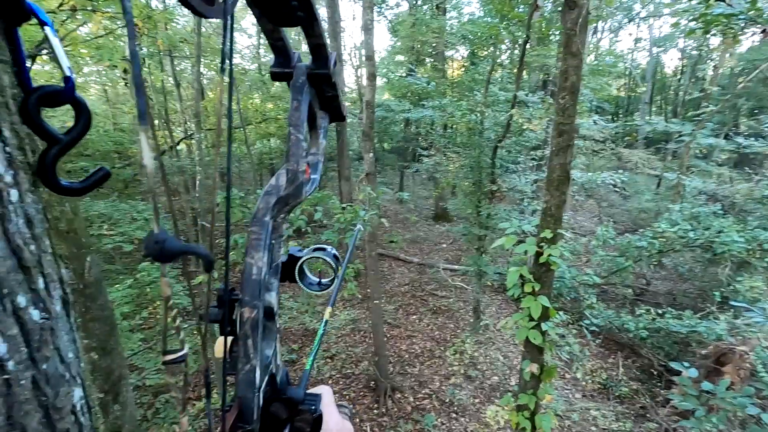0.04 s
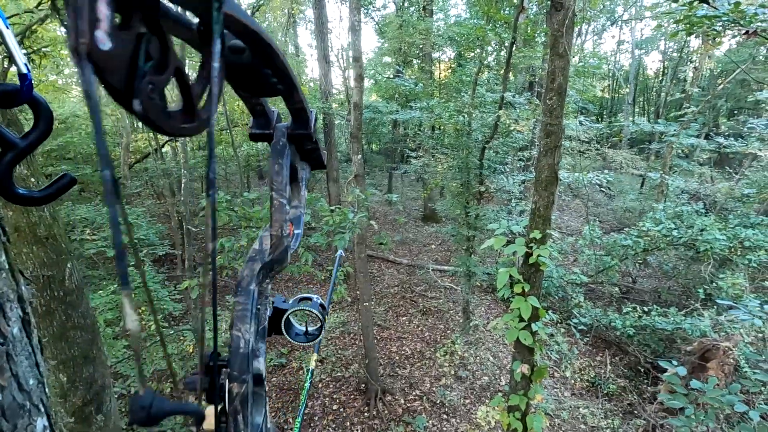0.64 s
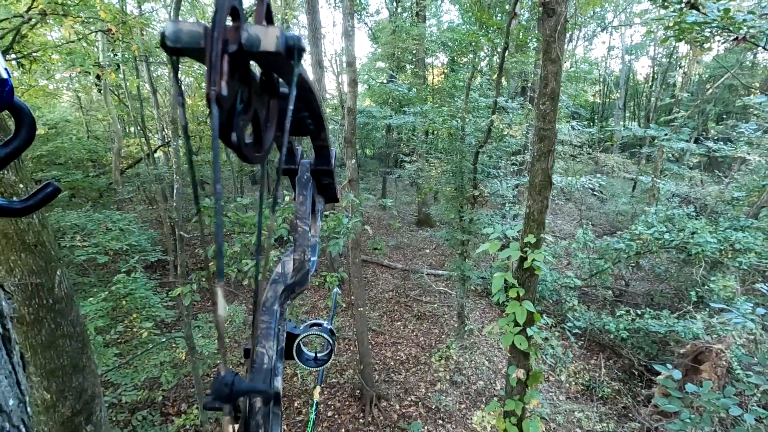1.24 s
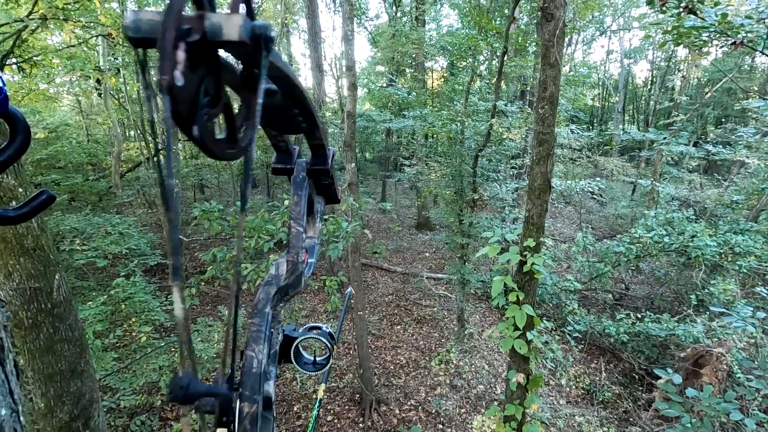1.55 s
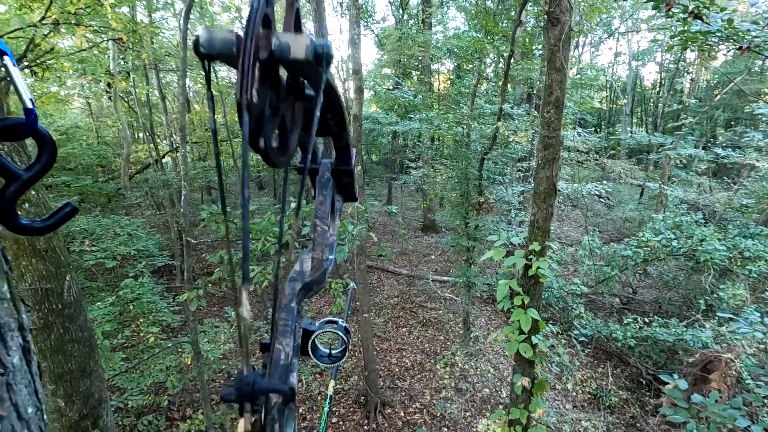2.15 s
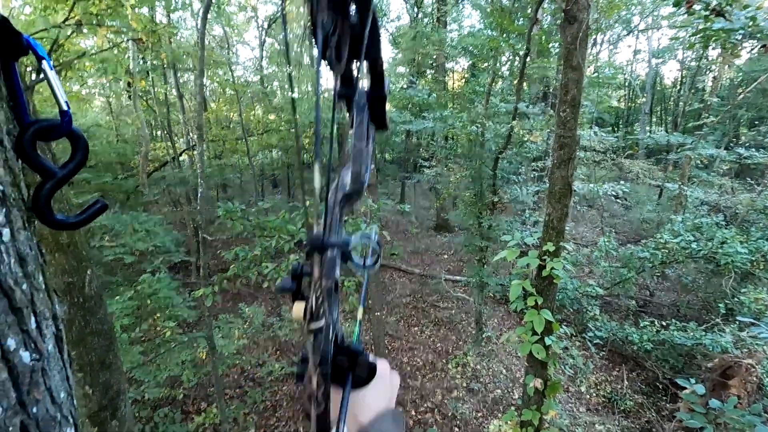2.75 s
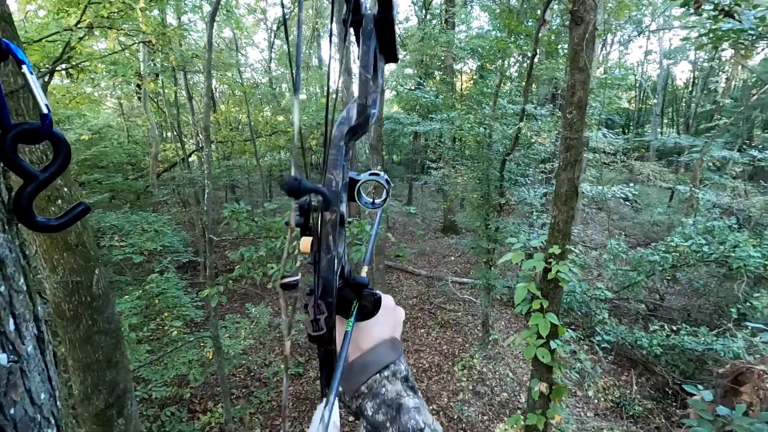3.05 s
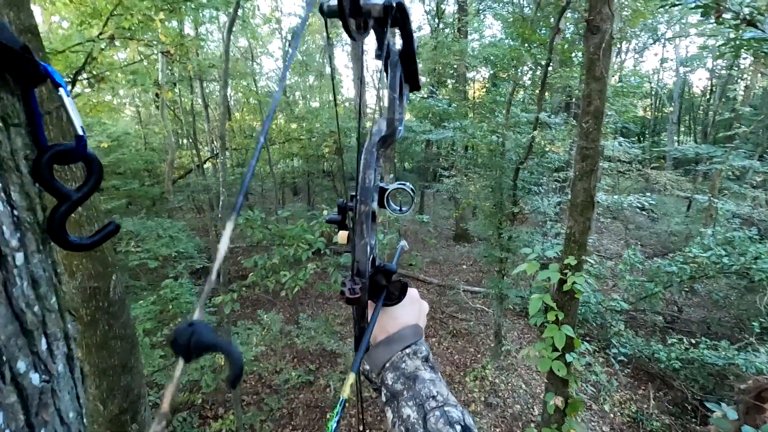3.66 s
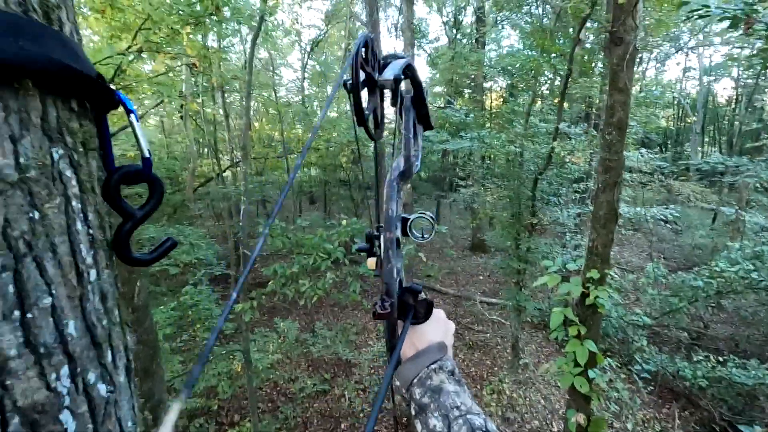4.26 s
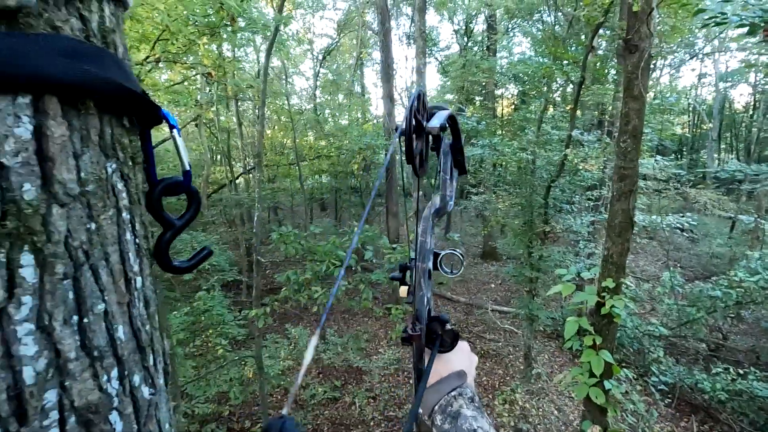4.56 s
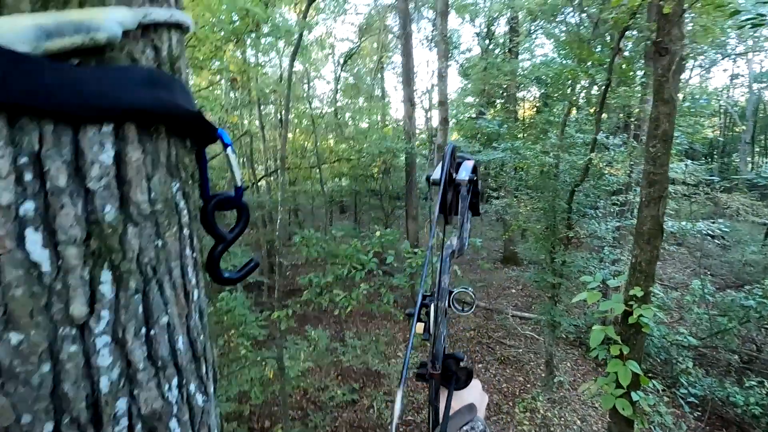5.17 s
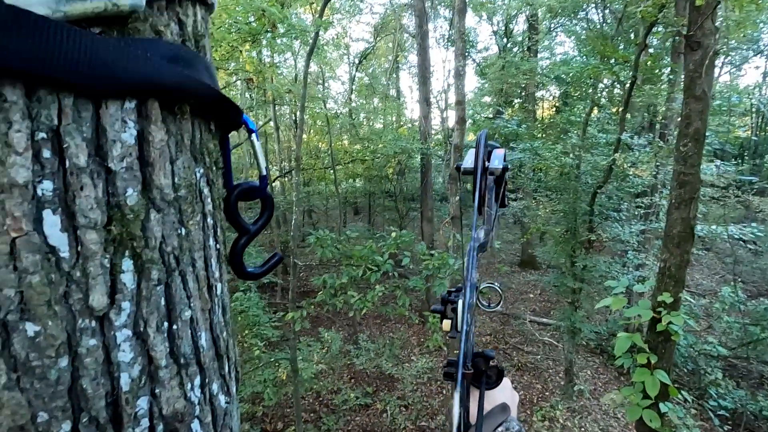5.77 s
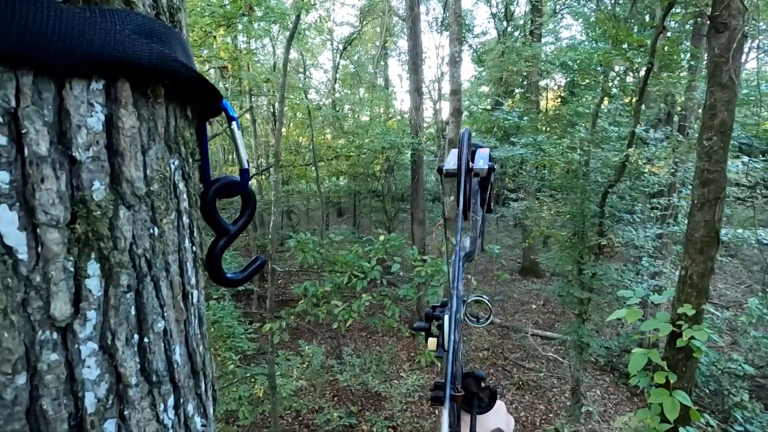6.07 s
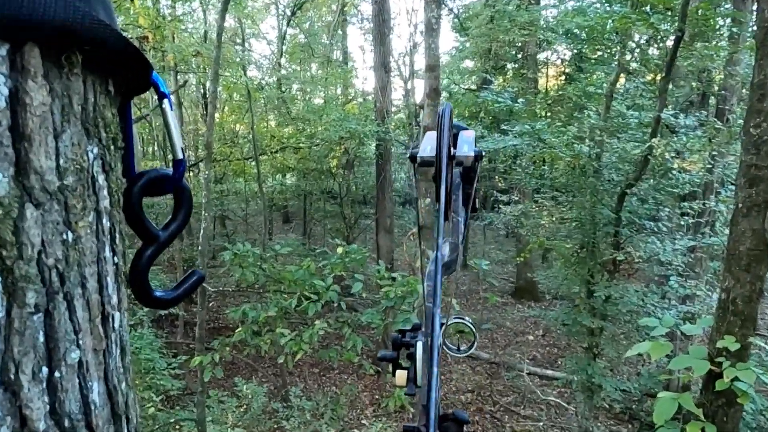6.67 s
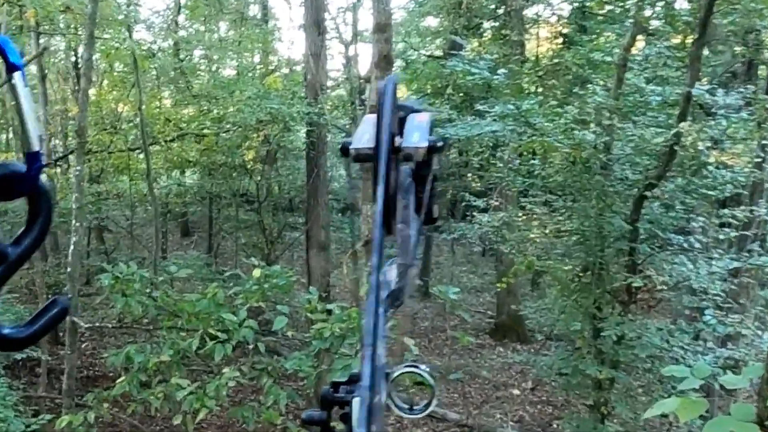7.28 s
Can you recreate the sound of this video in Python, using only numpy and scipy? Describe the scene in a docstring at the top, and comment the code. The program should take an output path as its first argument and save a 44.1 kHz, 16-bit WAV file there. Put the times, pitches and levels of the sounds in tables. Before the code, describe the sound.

A distant engine rumbles with a faint, wavering hum throughout, under the soft wash of a wood. Close to a body-worn microphone, sleeves rustle lightly and buckles give small clicks from the start. A thin bird chip sounds at 0.2 seconds, and a faint two-note song repeats five times between 1 and 2 seconds. From about 2.7 to 3.7 seconds the cloth rubs louder, creaking and giving a short rising zip, with a sharp click at 3. The bow knocks dully from 3.5 seconds, loudest at 3.9 and 4.1, with another sharp click at 4.2 and low jostling on the microphone. One more firm knock lands at 5.1. Afterwards only faint rustles and ticks remain. The bird chips again around 4.6, 6.1 and 7.5 seconds, and at 6.5 a falling whistle with a hoarse ending echoes among the trunks.

```python
"""A far engine rumbles and hums under the soft wash of a wood, heard from an archer's perch up a tree.
Sleeves rustle, creak and zip as cloth drags over cloth while a bow is lifted and moved. Buckles click,
the bow knocks, and the archer's movements jostle a microphone worn on the body. Birds chip, sing far
off, chirp and give one falling whistle; the trunks scatter their calls into a long tail."""
import sys
import numpy as np
from scipy import signal
from scipy.fft import rfft, irfft
from scipy.io import wavfile
from scipy.ndimage import uniform_filter1d

SR = 44100
rng = np.random.default_rng(int(sys.argv[2]) if len(sys.argv) > 2 else 0)


def unload_wav(signal):
    """Save mono or channel-first audio to the path in sys.argv[1] as 16-bit WAV at rate SR, clipped to [-1, 1]."""
    wavfile.write(
        sys.argv[1],
        SR,
        np.round(np.clip(np.atleast_2d(signal).T, -1, 1) * 32767).astype(np.int16),
    )


N = 331632
TIME = np.arange(N) / SR


def undb(db):
    """Turn decibels into a gain."""
    return 10 ** (np.asarray(db) / 20)


def unit(x):
    """Scale a signal to an average power of 1."""
    return x / np.sqrt(np.mean(x ** 2))


def curves(rows):
    """Join the values in each column of a table with straight lines in time."""
    times, *columns = np.transpose(rows)
    return [np.interp(TIME, times, column) for column in columns]


def during(rows):
    """True from the first time in a table to the last."""
    return (TIME > rows[0][0]) * (TIME < rows[-1][0])


def colour(x, points):
    """Shape lows and highs along (frequency [Hz], level [dB]) points, fading outside them; power 1."""
    hz, db = np.transpose(points)
    octave, knots = np.log2(np.arange(N // 2 + 1) * SR / N + 1), np.log2(hz)
    outside = np.abs(octave - np.clip(octave, knots[0], knots[-1]))
    return unit(irfft(rfft(x) * undb(np.interp(octave, knots, db) - 20 * outside), N))


def wander(rate):
    """A smooth random wobble of typical size 1 that picks a new value `rate` times a second."""
    hold = int(SR / rate)
    steps = np.repeat(rng.standard_normal(N // hold + 1), hold)
    return unit(uniform_filter1d(uniform_filter1d(steps, hold), hold)[:N])


def pan(db):
    """Left and right gains that make the left side `db` louder."""
    return undb(np.array([[db], [-db]]) / 2)


def spread(pair, side_db):
    """Make stereo from two signals: the first sits in the middle, the second adds width."""
    return pair[0] + undb(side_db) * pair[1] * np.array([[1], [-1]])


def noise(side_db):
    """White stereo noise, wider as side_db rises."""
    return spread(rng.standard_normal((2, N)), side_db)


def swells(rows, rise=0.35, shape=1.22):
    """Loudness of movements that build quickly and fade more slowly; shape 1 is pointed, 2 rounded."""
    power = np.zeros(N)
    for s, length, db in rows:
        near = slice(*np.searchsorted(TIME, [s - 2 * length, s + 4 * length]))
        from_peak = np.maximum((s - TIME[near]) / rise, (TIME[near] - s) / (1 - rise)) / length
        power[near] += (undb(db) * np.exp(-from_peak ** shape)) ** 2
    return np.sqrt(power)


def repeat(call, events):
    """Play the same call at each (time [s], level [dB])."""
    return sum(undb(db) * np.pad(call, (int(s * SR), 0))[:N] for s, db in events)


def note(rows, quaver):
    """A pure bird tone whose pitch trembles by the fraction `quaver`."""
    hz, db = curves(rows)
    phase = 2 * np.pi * np.cumsum(hz * (1 + quaver * wander(400))) / SR
    return during(rows) * np.sqrt(2) * undb(db) * np.sin(phase)


def trunks(x, fade_s, echo_db, early_db):
    """The direct sound, then quick echoes from near trunks and a long tail from far ones."""
    t = TIME[:SR * 3 // 2]
    far, near = undb(-60 * t / fade_s), undb(early_db - 60 * t / 0.28)
    tail = noise(side_db=-5)[:, :len(t)] * (far + near) * (t > .004)
    tail /= np.sqrt(np.sum(tail ** 2) / 2)
    return x + undb(echo_db) * signal.fftconvolve(x[None], tail, axes=1)[:, :N]


def strikes(events, tones, reach_octaves, crack_db, contact_s):
    """Each blow gives a short crack and rings the object's own tones near its brightest pitch."""
    out, t = np.zeros((2, N)), TIME[:SR // 8]
    hz, tone_db, fade_s = np.transpose(tones)[:, :, None]
    push = 1 - np.exp(-(t / contact_s) ** 2)  # a soft contact builds up gradually
    for s, db, bright_hz, pan_db in events:
        weight = undb(tone_db) / (1 + (np.log2(hz / bright_hz) / reach_octaves) ** 4)
        detune = 1 + 0.015 * rng.standard_normal(hz.shape)
        waves = rng.choice([-1, 1], hz.shape) * np.sin(2 * np.pi * hz * detune * t)
        ringing = weight * waves * undb(-60 * t / fade_s)
        ring = np.array([ringing.sum(0), (ringing * rng.choice([-1, 1], hz.shape)).sum(0)])
        edges_hz = [bright_hz / 2, min(bright_hz * 1.42, SR / 4)]
        band = signal.butter(5, edges_hz, "band", fs=SR, output="sos")
        crack = signal.sosfilt(band, rng.standard_normal((2, len(t))) * undb(-60 * t / 0.022))
        pair = ring / np.abs(ring).max() + undb(crack_db) * crack / np.abs(crack).max()
        blow = push * spread(pair, side_db=-10)
        blow *= undb(db) * pan(pan_db) / np.abs(blow.mean(0)).max()
        start = int(s * SR)
        out[:, start:start + len(t)] += blow[:, :N - start]
    return out


# how fast the engine fires: (time [s], firing rate [Hz])
FIRING = [(0, 111.6), (2.3, 110.5), (3.8, 109.3), (4.5, 108.5), (6.9, 110.2), (7.52, 107.4)]
# the drone, a tone at three times the firing rate: (time [s], level [dB])
DRONE = [(0, -41.5), (1.0, -53), (1.2, -40.5), (1.6, -38.5), (1.9, -53), (3.1, -41.5), (3.8, -47),
         (4.55, -35.5), (5.0, -34.5), (5.25, -47), (7.52, -41)]
# the whine, a tone at four times the firing rate: (time [s], relative level [dB])
WHINE = [(0, -49.5), (1.6, -59), (2.4, -51), (4.9, -45.5), (5.4, -60), (7.52, -76)]
# tone colour of the exhaust's roar: (frequency [Hz], relative level [dB])
ROAR_COLOUR = [(380, -9), (560, -1), (680, -6.5), (820, -17)]
# tone colour of the engine's rumble: (frequency [Hz], relative level [dB])
RUMBLE_COLOUR = [(15, 13.5), (28, -1.5), (55, -1.5), (85, 3), (112, 1.5), (140, 1), (172, -1.5), (200, -7),
                 (250, -14), (310, -14.5), (370, -22), (600, -33), (900, -39)]


def engine(growth_db_per_s=0.2825, flutter_db=1.88):
    """Exhaust tones fade in and out on their long way through the trees, over a slowly growing rumble."""
    (hz,), (drone_db,), (whine_db,) = curves(FIRING), curves(DRONE), curves(WHINE)
    growth_db = growth_db_per_s * TIME
    phase = 2 * np.pi * np.cumsum(hz * (1 + 0.00322 * wander(12))) / SR
    roar = colour(noise(side_db=-7), ROAR_COLOUR) * undb(whine_db - 2)  # comes and goes with the whine
    first_db = -36 + 2 * growth_db
    second_db = -42 + growth_db + 0.42 * (drone_db - drone_db.mean())
    fourth_db = whine_db + 3 * wander(14) - 2
    hum = 0
    for multiple, db in enumerate([first_db, second_db, drone_db, fourth_db, fourth_db - 10], 1):
        hum += undb(db + flutter_db * wander(5)) * np.sin(multiple * phase + rng.uniform(0, 2 * np.pi))
    # each octave up arrives from more directions
    wide = [(f, db + 4 * np.log2(f)) for f, db in RUMBLE_COLOUR]
    pair = [colour(rng.standard_normal(N), points) for points in (RUMBLE_COLOUR, wide)]
    rumble = spread(pair, side_db=-15.5) * undb(-25 + growth_db + 0.89 * wander(8.5))
    return np.sqrt(2) * hum + roar + rumble


# tone colour of the wood's far wash: (frequency [Hz], relative level [dB])
WOOD_COLOUR = [(300, -18), (800, -9), (1100, 5), (1350, 6), (1800, -4), (2600, -13.5), (3800, -16.5),
               (4900, -14), (6000, -14), (7500, -15.5), (10000, -35.5), (12000, -26), (15000, -55)]


def wood(level_db=-51, swell_db=1.15):
    """The soft, wide wash of distance and leaves."""
    return colour(noise(side_db=-7), WOOD_COLOUR) * undb(level_db + swell_db * wander(2.384)) * pan(4.5)


# shifts of the archer's body: (peak time [s], length [s], level [dB])
BODY_SHIFTS = [(1.68, 0.19, -34), (3.3, 0.85, -17), (4.07, 0.33, -10), (4.59, 0.17, -15.5),
               (5.22, 0.4, -21.5)]


def jostle(sway_db=-33.5):
    """The body, never quite still, pushes slow pressure swings into the microphone, more on the right."""
    swing = colour(noise(side_db=-9.5), [(7, -12), (11, 9), (20, -2), (35, -6), (70, -14), (150, -26.5)])
    return unit(np.tanh(swing)) * (swells(BODY_SHIFTS) + undb(sway_db)) * pan(-2)


def threads(grain_db, side_db):
    """Cloth threads make many tiny slips, a few much stronger than the rest."""
    slips = rng.standard_normal((2, N)) * (rng.random((2, N)) < .2)
    strength = undb(grain_db * np.minimum(rng.exponential(size=(2, N)), 6))
    return spread(slips * strength, side_db)


def folds(low_hz, high_hz, cycles, count):
    """Small folds of cloth buckle at random, each ringing briefly at a pitch of its own."""
    when, pitch, size, lean = rng.random((count, 4)).T[:, :, None]
    hz = low_hz * (high_hz / low_hz) ** pitch
    t = TIME[:int(2 * cycles / low_hz * SR)]
    age = hz * t / cycles
    rings = size * hz * age * np.exp(-age) * np.sin(2 * np.pi * hz * t) * (1 - t / t[-1])
    samples = ((when * (N - len(t))).astype(int) + np.arange(len(t))).ravel()
    left_right = (lean + 0.23, 1.25 - lean)
    return unit(np.array([np.bincount(samples, (rings * share).ravel(), N) for share in left_right]))


# strokes of the sleeves: (fastest moment [s], length [s], relative level [dB], brightness [dB])
STROKES = [(0.12, 0.41, -56, 5.5), (0.362, 0.13, -45, -2.5), (0.436, 0.13, -51.5, -5),
           (0.552, 0.27, -53.5, 5), (0.76, 0.19, -49.5, -8), (0.834, 0.57, -49.5, 1.5),
           (1.14, 0.98, -57, -0.5), (1.487, 0.42, -45, 0.5), (1.529, 0.068, -40.5, -4),
           (1.753, 0.27, -49.5, -2), (2.038, 0.54, -49.5, 2.5), (2.179, 0.043, -45, -6),
           (2.247, 0.46, -47, -6), (2.377, 0.14, -46, -6.5), (2.675, 0.52, -42.5, -1.5),
           (2.834, 0.12, -42, 2), (2.966, 0.039, -38, 4), (3.03, .07, -50, 0), (3.082, 0.072, -38, 0.5),
           (3.18, 0.13, -39, -0.5), (3.249, 0.033, -35, 4.5), (3.3, 0.057, -34.5, 3.5),
           (3.375, 0.067, -37.5, 2), (3.432, 0.083, -39, 7), (3.484, 0.46, -38, 2.5),
           (3.545, 0.036, -40.5, 3), (3.665, 0.032, -43, 6), (3.864, 0.7, -45.5, -1.5),
           (4.105, 0.26, -45.5, -2.5), (4.21, 0.11, -44, 5), (4.393, 0.87, -54, -7.5),
           (4.555, 0.16, -48, -5.5), (4.68, 0.37, -52, 1), (5.083, 0.11, -55, 9), (5.244, 0.21, -52, -1.5),
           (5.481, 0.099, -53, 8), (5.589, 0.17, -46, -1), (6.045, 0.2, -58.5, 9), (5.85, 0.25, -59.5, 7),
           (6.277, 0.31, -66.5, 13), (7.381, 0.26, -51, 3.5)]
# which side the arm is on: (time [s], left minus right [dB])
ARM_SIDE = [(0, 4.5), (2.4, 5.5), (2.8, 2.5), (3.5, 0.5), (4.5, 6.5), (5.6, 1)]
# tone colours of rubbing cloth, from dull to fine: (frequency [Hz], relative level [dB])
SCRAPE_COLOUR = [(200, -34), (400, 2.5), (560, -1.5), (800, -5), (1200, 4), (1700, 2), (2500, -1.5),
                 (4000, -9), (8000, -19)]
HISS_COLOUR = [(1200, 1.5), (2500, 1), (4000, 2.5), (5500, 3), (7600, -0.5), (8500, -11.5), (10500, -18.5),
               (13000, -44)]
SIZZLE_COLOUR = [(6000, -4), (8500, 1.5), (10500, -8.5), (12200, -0.5), (13300, -13), (15000, -28)]


def sleeves(catch_db=1.29):
    """Cloth drags over cloth, catching and letting go: folds rasp, threads hiss, pressed cloth creaks."""
    # a bright, glancing stroke trades scrape for sizzle
    scrape_gain = swells([(s, length, db - bright) for s, length, db, bright in STROKES])
    hiss_gain = swells([(s, length, db) for s, length, db, _ in STROKES])
    sizzle_gain = swells([(s, length, db + bright) for s, length, db, bright in STROKES])
    # folds buckle only in fast strokes
    rasp = folds(1800, 8970, cycles=9, count=16000) * 0.81 * hiss_gain / hiss_gain.max()
    scrape = colour(unit(threads(grain_db=0.5, side_db=-4.5)) + rasp / 2, SCRAPE_COLOUR)
    hiss = colour(unit(threads(grain_db=1.5, side_db=-8.5)) + rasp, HISS_COLOUR)
    sizzle = colour(threads(grain_db=2.5, side_db=-1.5), SIZZLE_COLOUR)
    left_db, = curves(ARM_SIDE)
    lows = (scrape * scrape_gain * undb(3) + creak()) * undb(np.array([left_db, -left_db]) / 2)
    highs = hiss * hiss_gain * undb(4) * pan(1) + sizzle * sizzle_gain * undb(-10) * pan(6)
    return (lows + highs) * undb(catch_db * wander(70))


# one chip of a bird: (time from its start [s], pitch [Hz], relative level [dB])
CHIP = [(0, 5100, -12), (.003, 5900, 0), (.006, 6700, 1), (.010, 7400, 0), (.018, 7750, -4),
        (.023, 7850, -20)]
# when the bird chips: (time [s], relative level [dB])
CHIP_TIMES = [(0.235, -41), (4.584, -44.5), (6.069, -40), (7.489, -40.5)]


def chips():
    """A bird gives thin, rising chips that linger among the trunks."""
    calls = repeat(note(CHIP, quaver=0.0058), CHIP_TIMES)
    return trunks(calls, fade_s=1, echo_db=6.5, early_db=1) * pan(-0.5)


# clicks of the gear: (time [s], level [dB], brightest pitch [Hz], left minus right [dB])
CLICKS = [(.302, -28.5, 4460, 2), (.903, -29, 6000, 2), (1.104, -36, 6500, 1), (1.199, -36, 6640, -2),
          (1.2575, -31.5, 5610, 1), (1.676, -31, 6100, 4), (1.9705, -24.5, 3600, 5), (3.0105, -18, 6000, 1),
          (4.2405, -12, 2650, -1), (4.998, -34, 5600, -1), (3.9072, -21, 3010, -1), (4.1153, -20, 3170, -2),
          (5.654, -44, 5180, 0), (5.805, -35, 1390, 0), (6.329, -31.5, 6740, 1), (7.339, -35, 5030, 0)]
# tones that the fittings ring with: (pitch [Hz], relative level [dB], time to fade by 60 dB [s])
FITTING_TONES = [(1070, 5.5, 0.049), (2290, 1, 0.051), (2810, -0.5, 0.049), (3600, 2, 0.014),
                 (4160, -4, 0.03), (4770, -1, 0.06), (4960, 0, 0.024), (6100, 21, 0.0029), (7100, 5, 0.02),
                 (9300, -4, .02)]


def clicks():
    """Buckles and fittings take hard little taps and ring briefly."""
    return strikes(CLICKS, FITTING_TONES, reach_octaves=1.2, crack_db=-5, contact_s=.0002)


# one two-note phrase: (time from its start [s], pitch [Hz], relative level [dB])
PHRASE = [(0, 3206, -5), (.012, 3350, 0), (.035, 3330, -8), (.055, 3000, -18), (.075, 2900, 0),
          (.1, 2840, -4), (.115, 2820, -22)]
# when the phrase is sung: (time [s], relative level [dB])
PHRASE_TIMES = [(0.991, -45.5), (1.209, -43.5), (1.43, -39), (1.654, -41), (1.877, -45)]
# a quick falling chirp: (time [s], pitch [Hz], level [dB])
CHIRP = [(1.708, 6200, -52), (1.72, 5800, -43), (1.732, 5200, -52), (1.742, 5040, -60)]


def far_birds():
    """A repeated two-note song and one chirp echo from far off among the trunks."""
    song = repeat(note(PHRASE, quaver=.04), PHRASE_TIMES) * undb(-6)
    chirp = note(CHIRP, quaver=0.0089)
    return trunks(song + chirp, fade_s=.4, echo_db=-1, early_db=-6)


# hard presses on the cloth: (peak time [s], length [s], level [dB])
PRESSES = [(2.28, 0.082, -37.5), (2.8, 0.37, -33.5), (3.03, .16, -39), (3.27, 0.38, -36.5),
           (3.65, 0.18, -49), (4.5, 1, -50)]
# tone colour of pressed cloth: (frequency [Hz], relative level [dB])
CREAK_COLOUR = [(200, 1), (370, 5), (540, 1.5), (750, -12.5), (1000, -9.5), (1280, -6), (1800, -9)]


def creak():
    """Under pressure, the folds of a sleeve buckle with a low creak."""
    return swells(PRESSES) * colour(folds(302.6, 1864, cycles=2.6, count=7000), CREAK_COLOUR)


# groans of taut cloth: (peak time [s], length [s], level [dB], slip rate [Hz], strongest pitch [Hz])
GROANS = [(2.797, .05, -43, 148, 1220), (3.233, 0.035, -29.5, 380, 575), (3.33, .04, -33, 310, 1200),
          (3.373, .035, -34, 420, 1500)]


def groans(jitter=0.038, uneven_db=3):
    """Taut cloth sticks and slips, quickly and unevenly, in short, grainy groans."""
    out = 0
    for s, length, db, slip_hz, body_hz in GROANS:
        cycles = np.cumsum(slip_hz * (1 + jitter * wander(300))) / SR
        slips = np.diff(np.floor(cycles), prepend=0) * undb(uneven_db * wander(300))  # one tick a cycle
        body = [(body_hz / 2, -8), (body_hz, 0), (2 * body_hz, -8)]
        out += swells([(s, length, db)]) * colour(slips, body)
    return out


# the weave zipping past as the arm stretches: (time [s], rib rate [Hz], relative level [dB])
ZIP = [(3.22, 5500, -52), (3.33, 6100, -44), (3.385, 6850, -33), (3.405, 6900, -38), (3.43, 7100, -32.5),
       (3.5, 7800, -37), (3.56, 8300, -43), (3.65, 8200, -46), (3.7, 8500, -58)]
# patches of weave that zip together: (multiple of the rib rate [ratio], relative level [dB])
PATCHES = [(.58, -8), (.7, -7), (.8, -5), (.9, -6), (1, -5), (1.17, -10)]


def weave():
    """Ribs of the weave skip over each other in patches, each catching unevenly: a rough, rising zip."""
    hz, db = curves(ZIP)
    out, tug = 0, wander(60)
    for ratio, patch_db in PATCHES:
        rate = ratio * hz * (1 + .024 * wander(3000) + .015 * tug + .025 * wander(90))
        grip = undb(db + patch_db + 3 * wander(70) + 2.5 * wander(500))
        out += grip * np.sin(2 * np.pi * np.cumsum(rate) / SR)
    return during(ZIP) * out


# knocks of the bow: (time [s], level [dB], brightest pitch [Hz], left minus right [dB])
KNOCKS = [(3.524, -22, 820, 15), (3.726, -18, 840, 4), (3.907, -22, 612, -12), (3.9105, -7.5, 306, -5),
          (3.9145, -26, 454, -11), (3.9148, -22, 1200, -2), (3.919, -18, 121, 1), (4.115, -20.5, 705, -3),
          (4.1185, -3, 146, -5.5), (4.1225, -13, 370, -10), (4.862, -30, 640, -1), (4.939, -26, 900, 3),
          (5.1293, -17, 1470, 2), (5.1305, -24, 580, 8), (5.1308, -6.5, 133, 6)]
# tones that the bow and mount ring with: (pitch [Hz], relative level [dB], time to fade by 60 dB [s])
BOW_TONES = [(158, 14, 0.028), (270, 0, 0.056), (343, -5.5, 0.034), (410, 7, 0.02), (588, 4, 0.02),
             (730, -6.5, 0.037), (1003, 6, 0.019), (1170, -17, 0.022), (1290, 12.5, 0.0098),
             (1740, -22, 0.0068), (1845, 7.5, 0.026)]


def knocks(top_hz=2120):
    """The bow is bumped and rings with a dull knock; its padding takes away the highs."""
    blows = strikes(KNOCKS, BOW_TONES, reach_octaves=.8, crack_db=-12, contact_s=.0004)
    return signal.sosfilt(signal.butter(8, top_hz, fs=SR, output="sos"), blows)


# a bird's falling whistle: (time [s], pitch [Hz], level [dB], tones at thirds of the pitch [relative dB],
# voice an octave below [relative dB], roughness [fraction of the pitch])
WHISTLE = [(6.517, 4300, -62, -40, -50, .006), (6.526, 4330, -44, -40, -50, .005),
           (6.565, 4390, -42, -16, -40, .006), (6.588, 4260, -40.5, -20, -30, .006),
           (6.618, 4370, -42, -28, -20, .01), (6.645, 3850, -43.5, -30, -3, .015),
           (6.68, 3420, -41.5, -30, -2, .02), (6.715, 3290, -43, -25, -7, .03),
           (6.742, 3300, -42.5, -11, -20, .07), (6.765, 3800, -40.5, -10, -25, .07),
           (6.78, 3750, -56, -15, -40, .07)]


def whistle():
    """A held whistle splits into thirds of its pitch, drops with a voice an octave below, ends hoarse."""
    hz, db, thirds_db, low_db, rough = curves(WHISTLE)
    phase = 2 * np.pi * np.cumsum(hz * (1 + rough * wander(1500))) / SR
    effort = during(WHISTLE) * np.sqrt(2) * undb(db)
    hoarse = rough / rough.max()
    tone = np.sin(phase) + undb(-24) * np.sin(2 * phase)
    thirds = .8 * np.sin(phase * 4 / 3) + hoarse * np.sin(phase * 2 / 3) + .3 * np.sin(phase * 5 / 3)
    low_overtone = undb(np.minimum(low_db, -19)) * np.sin(1.5 * phase)
    rasp = colour(rng.standard_normal(N), [(4500, 3), (5300, 4), (7500, -2), (8800, -15)])
    cry = effort * (tone + undb(thirds_db) * thirds + low_overtone + hoarse * undb(-14) * rasp)
    echoed = repeat(cry, [(0, 0.5), (.07, -22)])  # a big trunk throws it back
    low_voice = effort * undb(low_db) * np.sin(phase / 2)
    clear = trunks(low_voice, fade_s=.5, echo_db=-8, early_db=-6)  # long waves mostly slip past trunks
    return trunks(echoed, fade_s=1.13, echo_db=4, early_db=-6) + clear


def scene():
    """Gear and cloth at arm's length, engine and wood far off, birds in between."""
    gear = knocks() + clicks()
    distance = engine() + wood()
    birds = chips() + far_birds() + whistle()
    cloth = sleeves() + groans() + weave()
    return gear + distance + birds + cloth + jostle()


def record(dry, top_hz=15400):
    """The camera that the archer wears cuts off the very highest sounds."""
    return signal.sosfilt(signal.ellip(8, .2, 70, top_hz, fs=SR, output="sos"), dry)


dry = scene()
out = record(dry)
unload_wav(out)
```